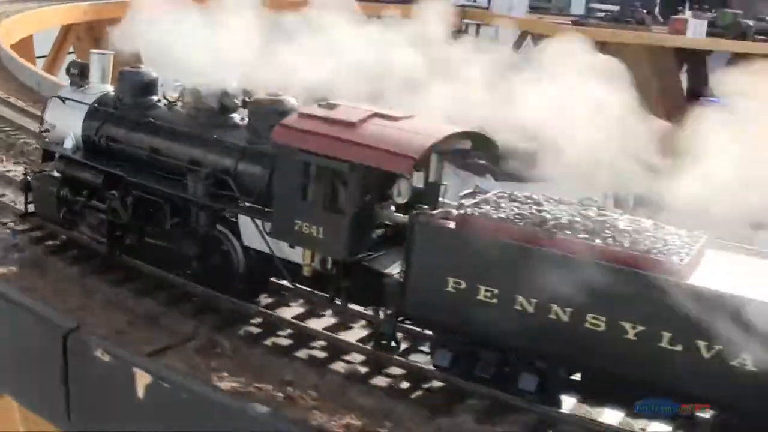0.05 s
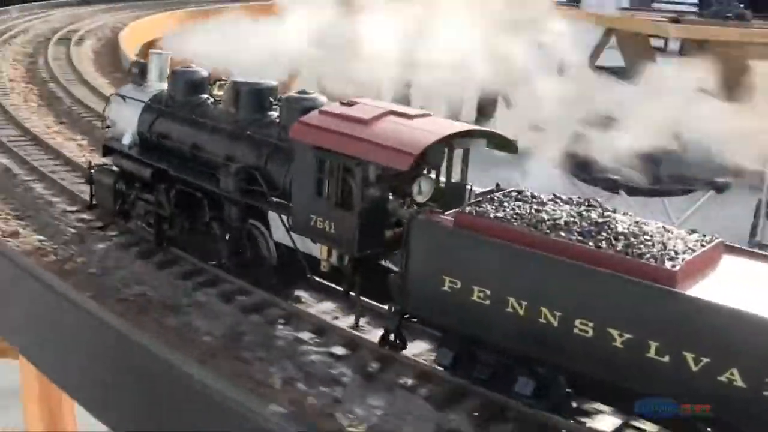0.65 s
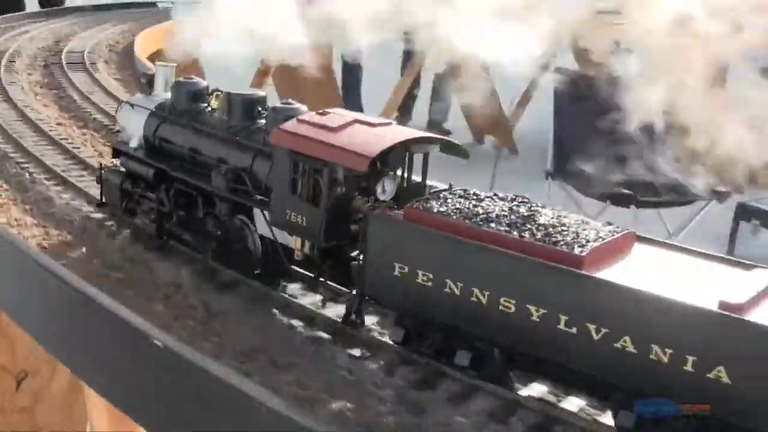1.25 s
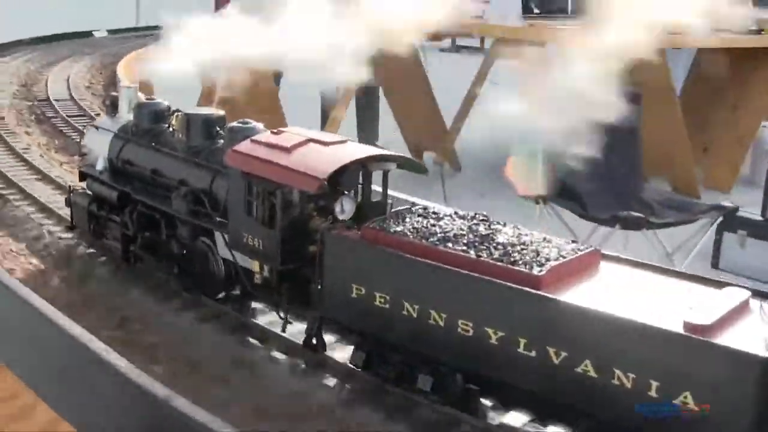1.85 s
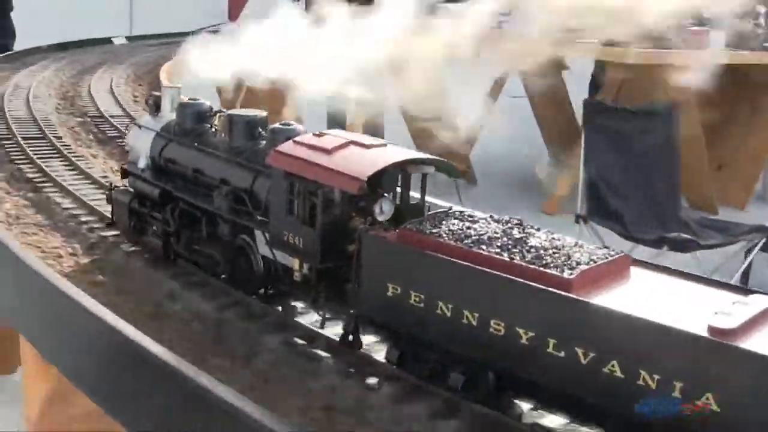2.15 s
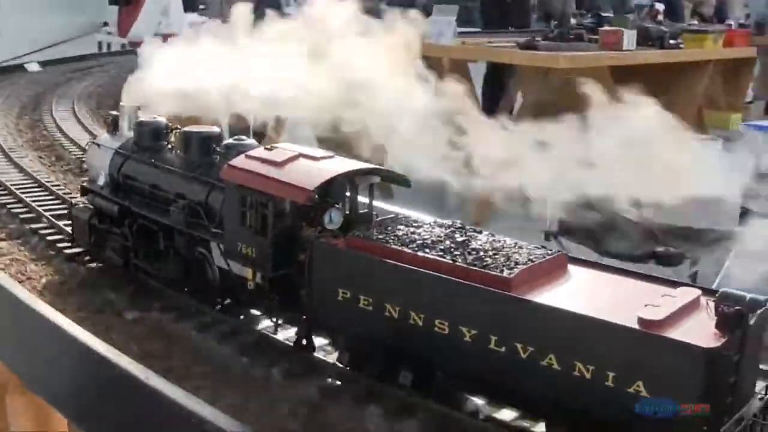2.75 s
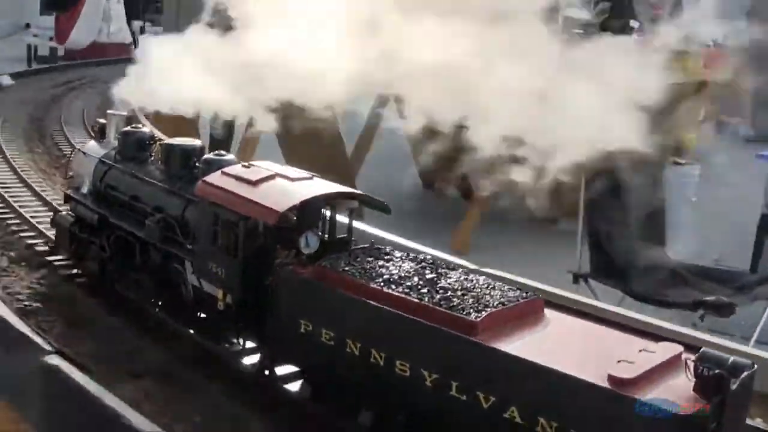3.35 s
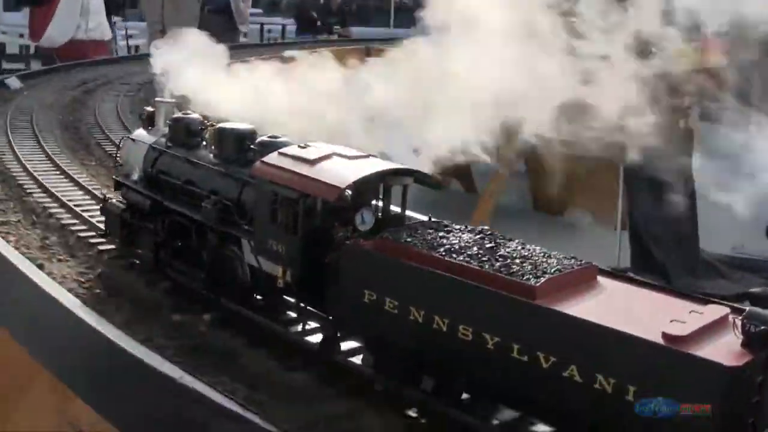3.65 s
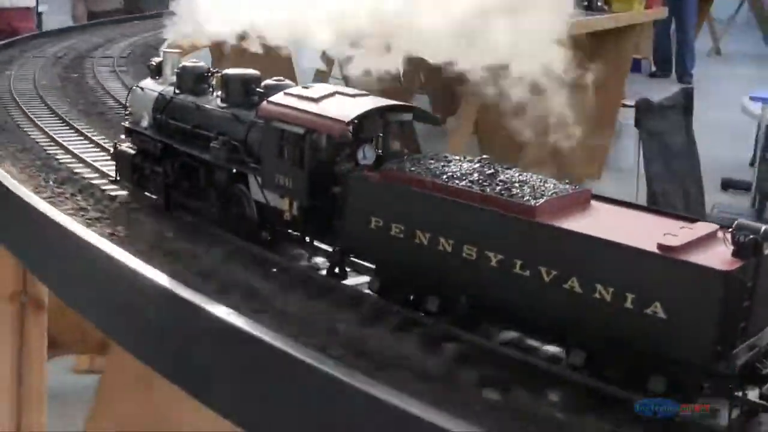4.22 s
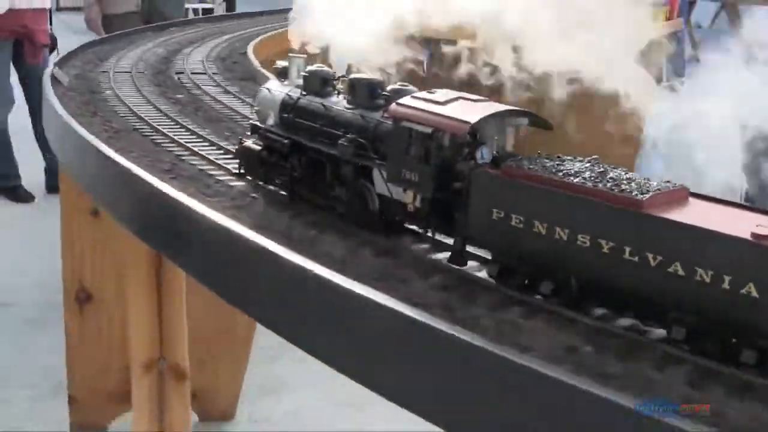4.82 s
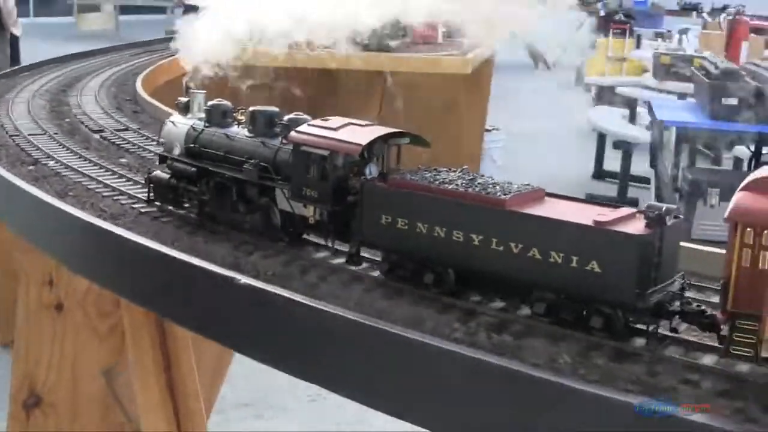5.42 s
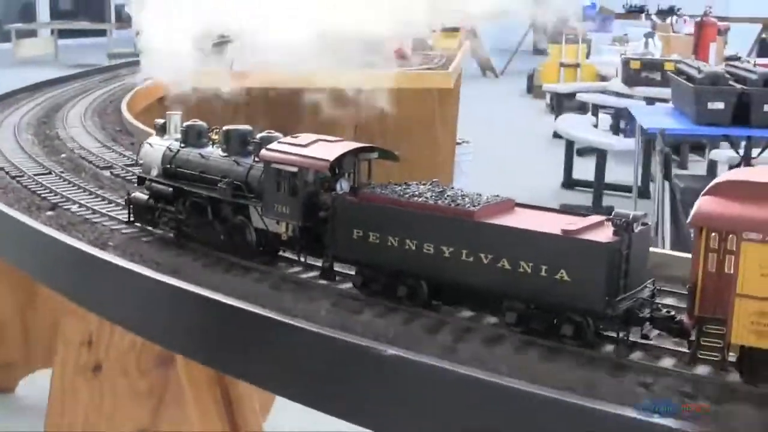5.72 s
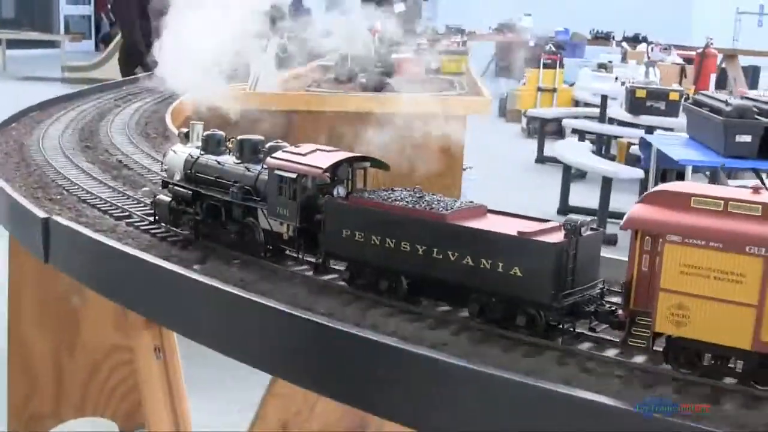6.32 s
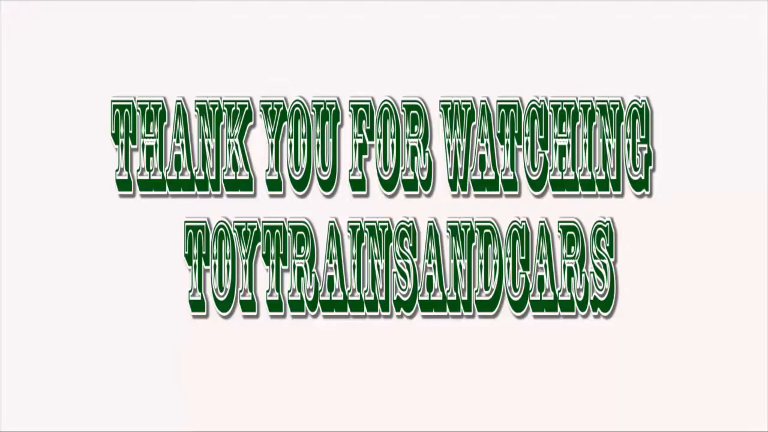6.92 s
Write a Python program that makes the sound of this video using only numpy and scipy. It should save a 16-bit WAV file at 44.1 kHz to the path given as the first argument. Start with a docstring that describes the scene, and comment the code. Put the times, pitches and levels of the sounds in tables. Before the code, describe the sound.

A model steam locomotive runs round a track in a hall, puffing rapidly and unevenly over a steady, ringing hiss of escaping steam. Its wheels rumble softly and knock on rail joints, more often in the second half. Air buffets the microphone following close by, mostly early on, while the hall drones faintly and a few brief low tones come and go. The sound cuts off abruptly.

```python
"""A model steam locomotive runs round a raised track in a hall, with a microphone following close by.
Four uneven puffs per wheel turn rush up the chimney, over the ringing hiss of escaping steam.
The wheels rumble and knock on the rail joints, air buffets the moving microphone, and the hall drones.
Faint, low tones come and go under the steam. The sound stops abruptly shortly before the end."""
import sys
import numpy as np
from scipy import signal
from scipy.fft import rfft, irfft
from scipy.io import wavfile
from scipy.ndimage import map_coordinates

SR = 44100
rng = np.random.default_rng(int(sys.argv[2]) if len(sys.argv) > 2 else 0)


def log_audio(samples):
    """Write samples as a 16-bit WAV file to the path given in sys.argv[1]."""
    # one column per channel
    frames = np.atleast_2d(samples).T
    # limit to full scale, then quantise
    limited = np.clip(frames, -1, 1)
    pcm = np.round(limited * 32767).astype(np.int16)
    wavfile.write(sys.argv[1], SR, pcm)


N = 311770
TIME = np.arange(N) / SR
FREQS = np.maximum(np.arange(N // 2 + 1) * SR / N, 1)


def undb(db):
    """Turn decibels into a factor to multiply by."""
    return 10 ** (np.asarray(db) / 20)


def unit(x):
    """Scale x to an average strength (rms) of 1."""
    return x / np.sqrt(np.mean(x ** 2))


def curves(table):
    """Join each column of a table by straight lines in time."""
    times, *columns = np.transpose(table)
    return [np.interp(TIME, times, column) for column in columns]


def bell(hz, width_hz):
    """A smooth bump around one frequency."""
    return np.exp(-((FREQS - hz) / width_hz) ** 2)


def swell(s, half_s):
    """A smooth rise and fall around the time s."""
    return np.exp(-((TIME - s) / half_s) ** 2)


def colour(x, spectrum, resonances=()):
    """Give x a smooth spectrum with ringing peaks on top; strength 1."""
    hz, db = np.transpose(spectrum)
    smooth_db = np.interp(np.log(FREQS), np.log(hz), db)
    peaks_db = sum(peak * bell(f, width) for f, width, peak in resonances)
    return unit(irfft(rfft(x) * undb(smooth_db + peaks_db), N))


def lift(x, hz, width_hz, db):
    """Raise or lower one band of x by a level that may move."""
    return x + (undb(db) - 1) * irfft(rfft(x) * bell(hz, width_hz), N)


def delayed(x, ms):
    """x heard later, by a delay that may move."""
    return map_coordinates(x, [np.arange(N) - ms * SR / 1000], order=3)


def wander(rate):
    """A smooth random curve with about `rate` new values a second; strength 1."""
    return unit(irfft(rfft(rng.standard_normal(N)) * bell(0, rate / 2), N))


def turbulence(rate, depth_db):
    """White noise whose strength flutters."""
    return rng.standard_normal(N) * undb(depth_db * wander(rate))


def ticks(rate, spread_db):
    """About `rate` random clicks a second, of uneven size; strength 1."""
    clicks = (rng.random(N) < rate / SR) * rng.standard_normal(N)
    return unit(clicks * undb(spread_db * np.minimum(rng.exponential(size=N), 4)))


def steam_flow(speed, steady_db):
    """Four times a wheel turn a valve opens and a cylinder empties; some steam passes all the time."""
    # the four puffs: start/turns, opening time/turns, emptying time/turns, relative level/dB
    puffs = [(.045, 0.093, 0.089, 3.5), (.365, 0.051, 0.26, 0), (.585, 0.1, 0.08, -1),
             (.825, 0.084, 0.05, 1.5)]
    turns = .345 + np.cumsum(speed) / SR
    scatter_db = 0.73 * rng.standard_normal((int(turns[-1]) + 2, len(puffs)))  # no two puffs are alike
    power = undb(steady_db) ** 2
    for (start, rise, fall, db), extra_db in zip(puffs, scatter_db.T):
        turn, since = np.divmod(turns - start + 1, 1)
        opening = np.sin(np.pi / 2 * np.clip(since / rise, 0, 1)) ** 2
        pressure = np.exp(-(np.maximum(since - rise, 0) / fall) ** 1.7)
        power = power + opening * pressure * undb(db + extra_db[turn.astype(int)]) ** 2
    return unit(np.sqrt(power))


def exhaust():
    """A wet jet of steam, spitting droplets, makes the chimney ring; more speed makes it louder."""
    # speed of the driving wheels, slowing in the bend: t/s, speed/(turns per s)
    wheel_speed = [(0, 4.993), (.5, 5.15), (1.9, 5.293), (2.7, 5.089), (3.3, 4.846), (4.3, 4.661),
                   (5.6, 4.722), (6.2, 5.0), (6.6, 5.04)]
    # spectrum of the jet: f/Hz, relative level/dB
    jet_spectrum = [(20, -43.5), (100, -18), (300, -14.5), (750, -8), (1600, -1), (1920, -11.5),
                    (2800, -8.5), (3400, -4), (5100, -0.5), (6200, -3.5), (10500, -3), (11650, -11),
                    (14700, -7.5), (15500, -25)]
    # ringing peaks of the chimney: f/Hz, width/Hz, boost/dB
    chimney_peaks = [(1123, 130, 6), (2290, 200, 5.5), (3547, 160, 5.5), (4390, 380, 8), (6990, 490, 4),
                     (9595, 880, 7.5), (13140, 980, 15)]
    speed, = curves(wheel_speed)
    jet = unit(turbulence(rate=500, depth_db=0.38))
    droplets = undb(-13) * ticks(rate=1700, spread_db=4)
    puffing = (jet + droplets) * steam_flow(speed, steady_db=-4)
    sound = colour(puffing, jet_spectrum, chimney_peaks)
    note_hz, note_width_hz, _ = chimney_peaks[0]
    sound = lift(sound, note_hz, note_width_hz, db=3 * swell(2.95, .5))  # this note stands out mid-bend
    effort_db = 1.3 * (speed - 5)
    distance_db = 1.5 * np.maximum(TIME - 5.8, 0)  # the engine pulls away near the end
    return sound * undb(-16.5 + effort_db - distance_db)


def round_the_bend(x):
    """The exhaust changes tone as the engine turns: hollow in mid-bend, fuller and brighter after it."""
    # how reflections fill or hollow the sound: t/s, fullness/dB
    fullness = [(.05, -5), (.35, 1.5), (1.5, -1.5), (2.8, -1.5), (3.4, -4), (4.4, -5), (5, 2), (5.6, 3.5),
                (6.2, 0)]
    # the bands they act on: f/Hz, width/Hz, factor on the fullness
    reflected_bands = [(2220, 230, 1.2), (6670, 250, 0.43), (8110, 650, 1.1)]
    # bands that fade as the engine turns away: f/Hz, width/Hz, first boost/dB, last boost/dB, fade time/s
    fading_bands = [(2095, 110, 9.5, -1, 0.97), (3140, 170, 8, 0, 2.9)]
    # the highest treble of the exhaust: t/s, boost/dB
    sizzle = [(0, -2.5), (2.8, -3), (4.7, 1.5), (5.3, 1), (6.5, -2)]
    fullness_db, = curves(fullness)
    sizzle_db, = curves(sizzle)
    for hz, width_hz, factor in reflected_bands:
        x = lift(x, hz, width_hz, factor * fullness_db)
    for hz, width_hz, first_db, last_db, fade_s in fading_bands:
        x = lift(x, hz, width_hz, last_db + (first_db - last_db) * np.exp(-TIME / fade_s))
    return lift(x, hz=14200, width_hz=900, db=sizzle_db)


def hiss():
    """Steadily escaping steam sings with one broad peak that slides a little in pitch."""
    # course of the hiss: t/s, level/dB, ringing f/Hz
    course = [(0, -30, 4430), (.35, -21.5, 4450), (.65, -25, 4405), (1.0, -21, 4400), (2.4, -21.5, 4402),
              (3.7, -20, 4456), (4.4, -19.5, 4450), (5.3, -23, 4411), (6.4, -19, 4493)]
    # spectrum of the leak: f/Hz, relative level/dB
    leak_spectrum = [(500, -34.5), (2800, -24.5), (3500, -9), (5000, -8.5), (6500, -20.5), (14000, -49)]
    # its ringing peak: f/Hz, width/Hz, boost/dB
    leak_peak = [(4434, 310, 12.9)]
    level_db, ring_hz = curves(course)
    sound = colour(turbulence(rate=110, depth_db=1.5), leak_spectrum, leak_peak)
    position = np.cumsum(ring_hz / leak_peak[0][0])  # reading the noise faster raises its pitch
    return undb(level_db) * map_coordinates(sound, [position], order=3, mode="wrap")


def reflections(x, drift_ms):
    """Short echoes off the track bed slide as the engine moves and make the steam swish."""
    # echoes from nearby surfaces: delay/ms, relative level/dB
    echoes = [(.95, -16.5), (1.55, -17), (2.3, -18)]
    return x + sum(undb(db) * delayed(x, ms + drift_ms * wander(.6)) for ms, db in echoes)


def rolling():
    """Rough rails and rattling rods shake the wooden track bed."""
    # loudness of the rumble: t/s, level/dB
    loudness = [(0, -36.5), (1.1, -33.5), (3.7, -36), (4.5, -34), (5.4, -34.5), (6.3, -31)]
    # spectrum of the rumble: f/Hz, relative level/dB
    rumble_spectrum = [(20, -46.5), (50, -23), (110, -2), (220, 1), (400, -1.5), (700, 0.5), (1200, -7.5),
                       (2500, -8), (6000, -40)]
    level_db, = curves(loudness)
    rails = unit(turbulence(rate=30, depth_db=0.5))
    rods = undb(-5.5) * ticks(rate=70, spread_db=-3.5)
    return undb(level_db) * colour(rails + rods, rumble_spectrum)


def wind():
    """Swirls of air strike the microphone's two openings in gusts, mostly pushing them opposite ways."""
    # strength of the moving air: t/s, level/dB
    airflow = [(0, -53), (.35, -37), (.9, -42), (1.2, -33), (1.9, -31), (2.85, -53.5), (4.1, -58.5),
               (5.05, -39.5), (5.35, -58), (6.55, -51)]
    # spectrum of the buffeting: f/Hz, relative level/dB
    buffet_spectrum = [(20, -23), (50, -8.5), (90, -2), (170, -2.5), (300, -10), (500, -22), (1200, -51),
                       (4000, -79)]
    air_db, = curves(airflow)
    common, opposed = (colour(turbulence(rate=35, depth_db=1), buffet_spectrum) for _ in range(2))
    gusts = undb(air_db + 2.5 * wander(13))
    return gusts * (undb(-5.5) * common + undb(-0.5) * opposed * np.array([[1], [-1]]))


def hall():
    """The hall adds a wavering low drone, a rumble and an echo-like wash of noise."""
    # swells of the drone: t/s, half length/s, level/dB
    drone_swells = [(0.301, .7, -50), (1.751, 0.51, -42), (4.499, 0.81, -44), (6.2, 0.91, -47.5)]
    # spectrum of the hall's rumble: f/Hz, relative level/dB
    rumble_spectrum = [(20, -35.5), (50, -8), (100, -3.5), (200, -7), (400, -6), (1500, -13.5), (5000, -42)]
    # spectrum of the wash: f/Hz, relative level/dB
    wash_spectrum = [(40, -27), (150, -0.5), (400, 25), (700, 29), (1050, 26), (1320, 9), (1600, -16),
                     (3000, -59)]
    strength = sum(undb(db) * swell(s, half_s) for s, half_s, db in drone_swells)
    drone_hz = 82 + 4 * wander(20)
    drone = unit(np.sin(2 * np.pi * np.cumsum(drone_hz) / SR) * undb(2.5 * wander(22)))
    rumble = colour(turbulence(rate=9.8, depth_db=3.5), rumble_spectrum)
    wash = np.array([colour(turbulence(rate=4.2, depth_db=-1.5), wash_spectrum) for _ in range(2)])
    return strength * drone + undb(-45) * rumble + undb(-47.5) * wash


def knocks(decay_s, rattle_s, rattle_db):
    """A wheel drops into a rail joint: a short, dull clack with a faint rattle after it."""
    # wheels hitting joints: t/s, level/dB, f/Hz
    hits = [(.403, -22.5, 370), (2.131, -27, 260), (2.745, -21, 416.7), (3.171, -17, 370),
            (3.566, -16.5, 270.4), (3.784, -21, 430), (4.563, -22.5, 540), (4.81, -21.5, 379),
            (5.068, -18, 633.4), (5.425, -20, 610), (5.612, -19, 256), (5.797, -14.5, 714),
            (6.28, -20, 299.7)]
    out, age = np.zeros(N), TIME[:SR // 8]
    for s, db, hz in hits:
        band = signal.butter(2, [hz / 2, hz * 2], "band", fs=SR, output="sos")
        rattle = unit(signal.sosfilt(band, rng.standard_normal(len(age)))) * np.exp(-age / rattle_s)
        clack = signal.sosfilt(band, np.sin(2 * np.pi * hz * age) * np.exp(-age / decay_s))
        start = int(s * SR)
        out[start:start + len(age)] += undb(db) * (clack + undb(rattle_db) * rattle)
    return out


def groans():
    """Faint, unsteady low tones swell and die within a moment."""
    # the tones: t/s, level/dB, f/Hz, half length/s
    tones = [(2.72, -35, 637, 0.047), (2.94, -33, 577, 0.037), (3.463, -38.5, 573, 0.081),
             (3.753, -37.5, 517, 0.061), (5.876, -33, 576, 0.016), (6.053, -36, 534, .04),
             (6.168, -35.5, 373.3, 0.06), (6.237, -37.5, 700, .06)]
    out = np.zeros(N)
    waver = 1 + .045 * wander(70)
    for s, db, hz, half_s in tones:
        tone = unit(np.sin(2 * np.pi * hz * np.cumsum(waver) / SR))
        out += undb(db) * swell(s, half_s) * tone
    return out


def microphone(x):
    """Two close openings hear the engine nearly alike; mainly the treble is shaded and scattered."""
    # how the two sides compare: f/Hz, left minus right/dB, left lead/radians, side echo level/dB
    openings = [(200, -.3, 0, -40), (700, -1.4, 0, -40), (1150, 0, 0, -40), (3300, 0, 0, -42),
                (4000, .2, 0, -26), (4900, .5, .04, -22), (5600, 0, 0, -33), (8700, 0, 0, -32),
                (9300, -.1, .15, -20), (10800, -.2, .23, -15), (11600, 0, .12, -18), (12300, 1, .55, -14),
                (13400, 2.7, .62, -13), (14300, 3.5, .42, -11), (15200, .3, .03, -19)]
    hz, *columns = np.transpose(openings)
    balance_db, lead, echo_db = (np.interp(FREQS, hz, column) for column in columns)
    sides = np.array([[1], [-1]])  # left, right
    direct = undb(sides * balance_db / 2) * np.exp(1j * sides * lead / 2)
    side_echo = delayed(x, ms=5 + .35 * wander(10))
    return irfft(rfft(x) * direct + sides * undb(echo_db) * rfft(side_echo), N)


def scene():
    """The engine straight ahead of the microphone, in wind and hall noise."""
    steam = round_the_bend(exhaust()) + hiss()
    low_sounds = rolling() + knocks(decay_s=0.0031, rattle_s=0.016, rattle_db=-10) + groans()
    engine = reflections(steam, drift_ms=0.14) + low_sounds
    return microphone(engine) + wind() + hall()


def record(dry):
    """The loudest peaks are rounded, the sound stops abruptly, and the highest treble is cut."""
    stop_s, top_hz = 6.605, 15600
    running = np.clip((stop_s - TIME) / 0.008, 0, 1)
    rounded = dry / (1 + dry ** 4) ** .25
    low_pass = signal.ellip(12, .1, 90, top_hz, fs=SR, output="sos")
    return signal.sosfilt(low_pass, rounded * running)


dry = scene()
out = record(dry)
log_audio(out)
```